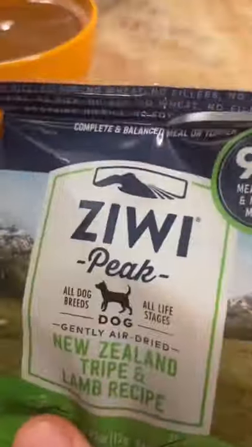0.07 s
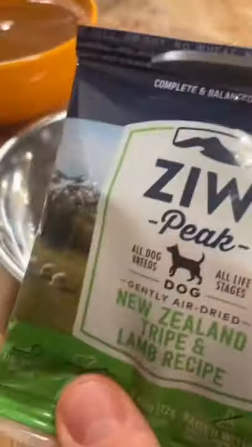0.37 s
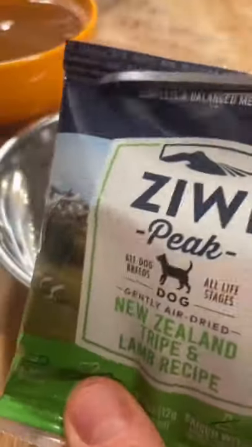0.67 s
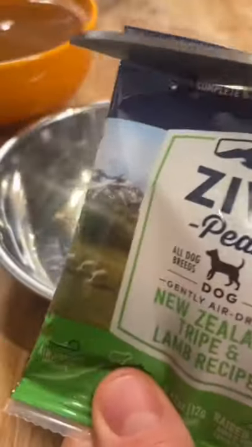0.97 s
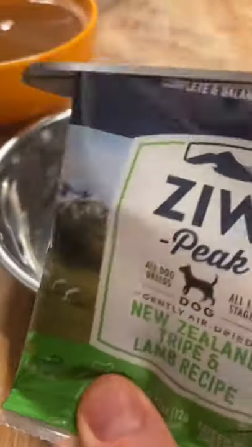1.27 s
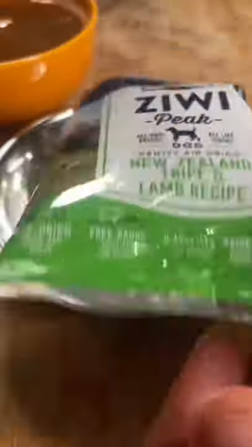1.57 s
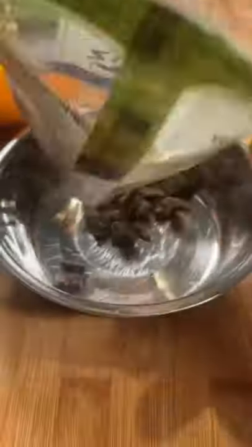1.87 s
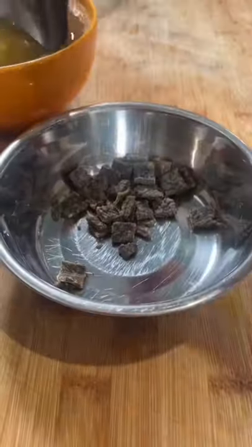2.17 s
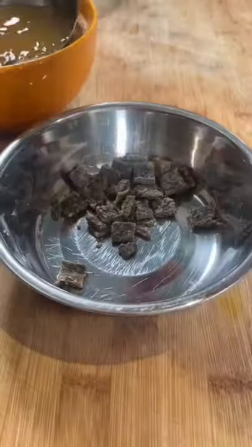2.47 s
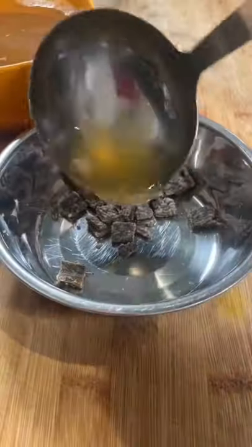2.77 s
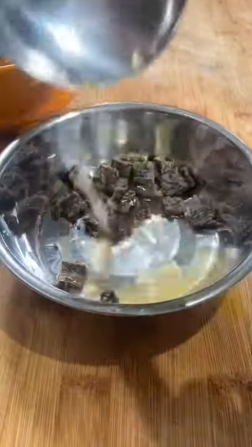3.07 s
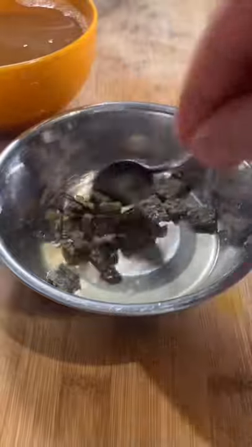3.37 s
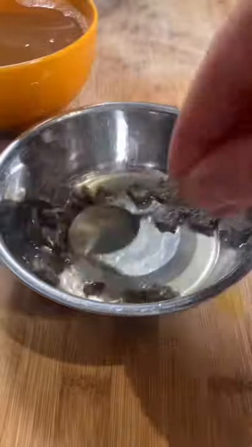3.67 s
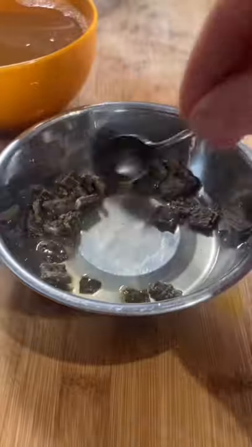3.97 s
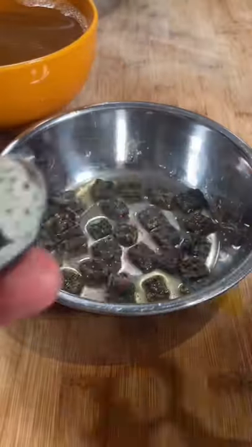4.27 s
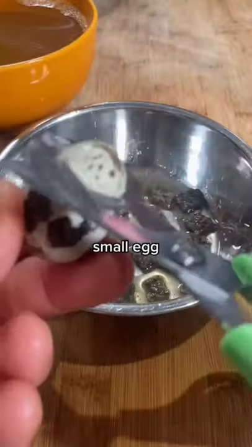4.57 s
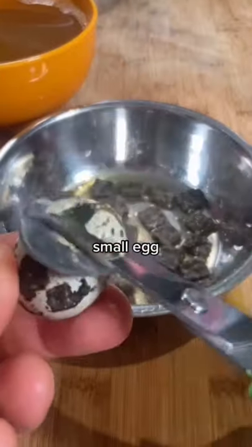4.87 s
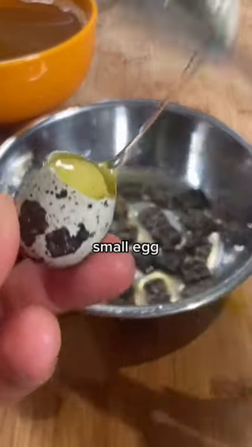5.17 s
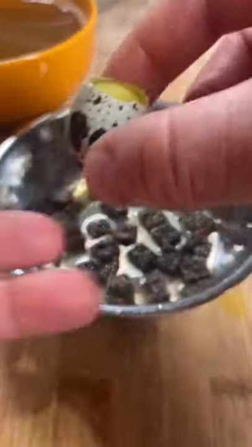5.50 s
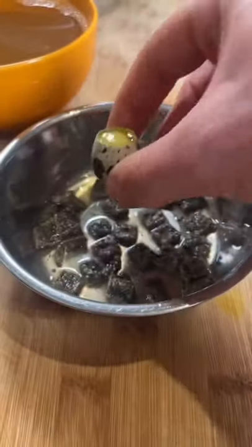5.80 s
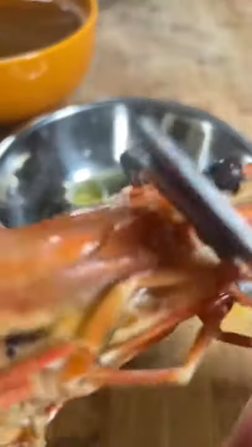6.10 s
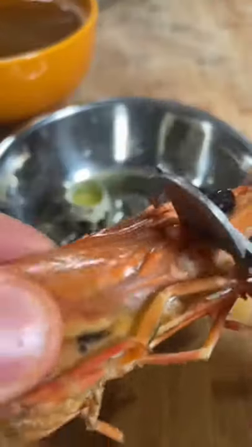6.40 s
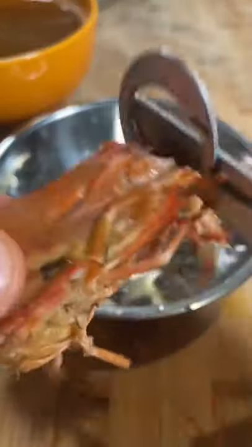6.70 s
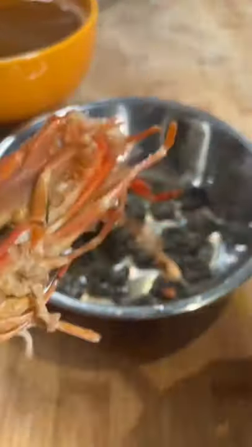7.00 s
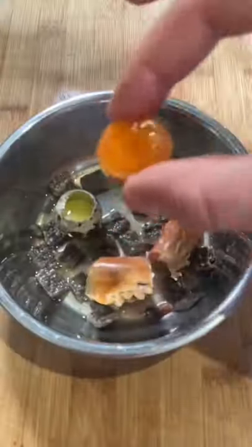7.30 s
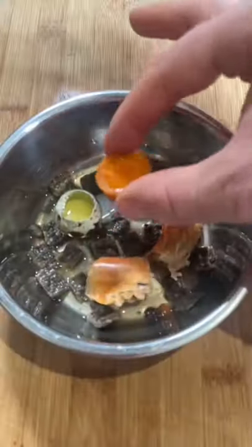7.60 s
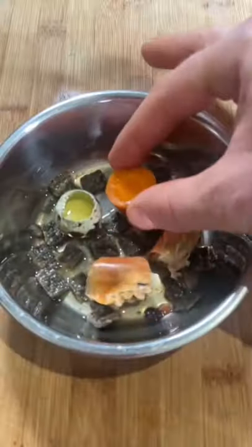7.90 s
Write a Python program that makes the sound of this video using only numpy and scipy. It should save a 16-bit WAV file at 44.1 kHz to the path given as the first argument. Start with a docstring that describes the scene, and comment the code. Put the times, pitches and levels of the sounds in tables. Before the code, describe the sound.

Scissors cut crinkling plastic, hard pieces clatter into a metal bowl, a spoon clinks and sloshes, and eggshell and prawn shell crunch.

```python
"""A dog's dinner in a steel bowl

A kitchen, the microphone close to the bowl; short moments follow one another, joined by hard cuts.
Scissors snip a plastic pouch and its creases snap, dried meat tumbles onto ringing steel, broth drips
from a ladle, and a spoon clinks and stirs up bubbles. Then the scissors crack a small egg and crunch
through a prawn's shell. Faint room air and an appliance's hum lie behind it all."""
import sys
import numpy as np
from scipy import signal
from scipy.fft import rfft, irfft
from scipy.io import wavfile
from scipy.ndimage import uniform_filter1d

SR = 44100
rng = np.random.default_rng(int(sys.argv[2]) if len(sys.argv) > 2 else 0)


def dump_mix(stems):
    """Bounce the given channels to the path in sys.argv[1] as a 16-bit WAV at rate SR."""
    frames = np.atleast_2d(stems).T  # one column per channel
    limited = np.clip(frames, -1, 1)  # hard clip at full scale
    pcm = np.round(limited * 32767).astype(np.int16)
    wavfile.write(sys.argv[1], SR, pcm)


N = 355005
TIME = np.arange(N) / SR
# where each moment starts: pouch, meat, ladle, stirring, shells, quiet ending (time [s])
CUT_TIMES = [0, 1.312, 1.936, 3.034, 4.106, 6.922]


def pouch():
    """Creases snap and crinkle under the scissors while the plastic bag flexes dully."""
    # creases snapping (time [s], relative level [dB], brightness [dB/octave], resonance [Hz])
    creases = [(0.0739, -23, 5, 4800), (0.4299, -32.5, -6.5, 1280), (0.4451, -29, -0.5, 3760),
               (0.4527, -23.5, 1.5, 2750), (0.4608, -22.5, -1.5, 3800), (0.4769, -24.5, -2.5, 2670),
               (0.4928, -21, 2.5, 2530), (0.6507, -39, -2.5, 587), (0.7954, -28, -1, 2720),
               (0.8256, -40, 1, 3920), (0.8795, -32, 2.5, 2780), (1.0433, -35, 1, 2900),
               (1.0811, -33, -4, 2360), (1.1077, -36, -3, 2680), (1.1248, -29, 6.5, 2530),
               (1.1353, -33, 5, 3270), (1.1952, -31, 2.5, 4080), (1.2475, -31.5, -3, 2400),
               (1.3957, -20.5, -2.1, 3220), (1.5123, -34.5, -4, 3900)]
    # colour of the plastic (frequency [Hz], level [dB])
    plastic = [(71, -38), (120, -17), (292, -4.5), (339, -16.5), (424, -2.5), (560, -9), (782, -3.5),
               (959, -5), (1090, -5), (1470, -6.5), (3210, 0), (3580, -4), (5000, -6), (8410, -15.5),
               (10100, -26.5), (13200, -51.5), (22000, -120)]
    # the hand squeezes for each snip, then tips the bag (peak [s], rise [s], fade [s], level [dB])
    squeezes = [(0.075, 0.045, 0.055, -47), (0.22, 0.16, 0.2, -51), (0.455, 0.088, 0.25, -40.5),
                (0.68, 0.05, 0.094, -51.5), (0.81, 0.19, 0.45, -57), (1.11, 0.088, 0.089, -37),
                (1.24, .1, 0.14, -49.5), (1.61, 0.26, .12, -41.5)]
    snaps = hits(creases, plastic, grain_s=0.0009, ring_db=10, scatter_s=0.0069, scatter_db=0.5,
                 thud_db=-4, body_db=4, edge_db=2.5, db=0)
    holding = gain_of(-63.5) * (TIME < CUT_TIMES[2])  # it rustles even when merely held
    grip = np.hypot(effort(squeezes), holding)
    crinkle = crackle(grip, plastic, per_s=8000, dull_db=0, crisp_db=1)
    flex = gain_of(-5) * grip * band_noise(80, 370)
    return snaps + crinkle + flex


def dried_meat():
    """Hard pieces slide out in a rush and land on the steel, whose ringing the heap damps."""
    # the biggest pieces (time [s], relative level [dB], brightness [dB/octave], resonance [Hz])
    landings = [(1.6259, -11.5, -2.5, 1640), (1.6287, -19.5, -6, 1420), (1.6443, -8, -2, 1619),
                (1.6596, -18, -4.5, 1590), (1.6653, -11, -1, 1390), (1.6796, -19, 4, 5730),
                (1.7654, -23, -5, 1550), (1.7883, -28.5, 4.5, 5860), (1.7993, -26.5, -3.5, 1620),
                (1.8463, -35, 0, 4390)]
    # colour of meat striking steel (frequency [Hz], level [dB])
    meat_on_steel = [(71, -54.5), (120, -29), (352, -26.5), (662, -16.5), (1050, -13), (1500, -6),
                     (1740, -8), (1910, -12), (2570, -10), (4230, -8), (4820, -15), (5910, -5),
                     (6490, -19.5), (9060, -23), (10100, -34), (13200, -65), (22000, -120)]
    # the rush of pieces (peak [s], rise [s], fade [s], level [dB])
    tumble = [(1.665, .03, 0.14, -20.5)]
    # modes of the bowl under the heap (frequency [Hz], relative level [dB], t60 [s])
    loaded_bowl = [(650.6, -4, 0.17), (801, -11, .25), (1204, -6.5, .25), (1305, -2.5, 0.18),
                   (1361, -5, 0.1), (1454, -10, 0.17), (1580, -9.5, 0.19), (1556, -3.5, 0.18),
                   (1710, -4, .22), (1750, -4, 0.31), (2498, -2, .2), (2549, -5, .2), (2560, -0.5, 0.11),
                   (2980, -8.5, 0.2), (3510, -8, 0.33), (4120, -7.5, 0.34), (4300, -12, 0.6),
                   (4505, -4, .7), (5800, -8, .25)]
    blows = hits(landings, meat_on_steel, grain_s=0.0015, ring_db=5, scatter_s=0.012, scatter_db=6,
                 thud_db=-7.5, body_db=1.5, edge_db=0, db=-1.5)
    blows += crackle(effort(tumble), meat_on_steel, per_s=1100, dull_db=-2, crisp_db=0)
    return on_bowl(blows, loaded_bowl, ring_db=-16.5) * (TIME < CUT_TIMES[2])


def bowl_clinks(split=0.0013, twin_db=-9):
    """The bowl rings until the next cut; not quite round, it has a weaker twin beating with each mode."""
    # steel modes (frequency [Hz], t60 [s], struck on rim [dB], on wall [dB], on base [dB])
    modes = [(482.4, 0.3, -46, -50, -34.5), (569, 0.41, -53, -55, -72.5), (1330, 1.8, -48, -55, -64),
             (2180, 2.3, -60, -42.5, -50.5), (2360, .3, -63, -72, -85), (2806, 2.13, -74, -47, -51),
             (3340, 1.43, -61, -40.5, -52.5), (3890, 1.8, -47, -46, -64), (4210, 0.54, -35.5, -61, -63),
             (4274, 0.95, -65, -45.5, -58), (4408, 0.39, -48, -52, -40.5), (4840, 0.85, -40, -43, -43.5),
             (4740, 0.67, -60, -53, -79), (5540, .4, -63, -67, -88.5), (5806, 0.33, -39, -30.5, -28.5),
             (6160, .45, -69, -44, -76), (6930, 0.16, -44, -38, -37), (7720, 0.14, -70, -38, -30),
             (8350, 0.076, -66, -32.5, -29)]
    # touches (time [s], gain [dB], place [0 rim, 1 wall, 2 base], softness [dB lost per kHz])
    touches = [(1.194, -1, 0, 0.5), (3.036, 5, 1, 2), (3.319, -14.5, 1, 2), (3.835, 2.5, 2, 13.5),
               (6.646, -7, 2, 5), (6.662, -5, 2, 0)]
    out = np.zeros(N)
    hz, t60, *place_db = np.transpose(modes)[:, :, None]
    for s, db, place, softness in touches:
        next_cut = min(cut for cut in CUT_TIMES if cut > s)
        t = np.arange(0, next_cut - s, 1 / SR)
        decay = gain_of(db + place_db[place] - softness * hz / 1000 - 60 * t / t60)
        phase = rng.random((len(hz), 1))
        tone = np.sin(2 * np.pi * (hz * t + phase))
        twin = gain_of(twin_db) * np.sin(2 * np.pi * (hz * (1 + split) * t + phase))
        add(out, s, (decay * (tone + twin)).sum(0) * attack(t, 0.00035))
    return out


def broth():
    """The ladle empties and the spoon shoves wet pieces against the bowl, sloshing with each stroke."""
    # ladle and spoon on meat (time [s], relative level [dB], brightness [dB/octave], resonance [Hz])
    shoves = [(2.7375, -43, -1, 1540), (2.7542, -42, 1, 1076), (2.8825, -38, 1, 1700),
              (3.1552, -29.5, 0, 1710), (3.2407, -31, 0, 980), (3.2796, -29.5, -3.5, 910),
              (3.3181, -25, 0, 615), (3.4321, -37, 0, 3430), (3.4656, -27, -1, 1380),
              (3.5741, -29.5, 0, 1100), (3.5787, -33, 0.5, 1480), (3.7428, -42, 0, 2150),
              (3.8347, -25, 0, 1363), (3.8763, -39.5, 0, 1060), (3.9364, -40.5, 3.5, 1590),
              (4.088, -37, 2.5, 9000)]
    # colour of wet meat (frequency [Hz], level [dB])
    wet_meat = [(71, -57), (120, -15), (161, -24.5), (292, -19), (474, -1.5), (726, -5), (874, -0.5),
                (1320, -5), (1940, -8.5), (2170, -7.5), (3450, -11), (4160, -12.5), (5000, -15),
                (9060, -20.5), (10100, -32), (13200, -65), (22000, -120)]
    # broth running off the ladle (peak [s], rise [s], fade [s], relative level [dB])
    ladlings = [(2.75, 0.022, 0.17, -54), (2.86, 0.12, 0.25, -55)]
    # strokes of the spoon (peak [s], rise [s], fade [s], relative level [dB])
    strokes = [(3.14, 0.084, 0.13, -39.5), (3.32, 0.05, .2, -47), (3.57, 0.055, 0.13, -42),
               (3.88, 0.015, 0.4, -44.5), (4.05, 0.083, 0.067, -43)]
    # modes of the bowl holding broth and meat (frequency [Hz], relative level [dB], t60 [s])
    wet_bowl = [(494, -13, 0.054), (847, -20, 0.058), (1120, -6.5, 0.06), (1303, 0, 0.025),
                (2830, -13.5, 0.062), (3450, 3.5, 0.024), (4370, -6, 0.087), (5170, 4.5, 0.033),
                (5940, -3, 0.028)]
    knocks = hits(shoves, wet_meat, grain_s=0.003, ring_db=8, scatter_s=0.0051, scatter_db=4.5,
                  thud_db=4, body_db=-1.5, edge_db=-4.5, db=-1)
    splash = crackle(effort(ladlings), wet_meat, per_s=970, dull_db=-4.5, crisp_db=-4)
    start_s, end_s = CUT_TIMES[3:5]
    stirring = effort(strokes) * (TIME > start_s) * (TIME < end_s)
    scrape = crackle(stirring, wet_meat, per_s=1100, dull_db=-7, crisp_db=-2.5, clump_db=1.5)
    froth = gain_of(-2.5) * stirring * bubbles(start_s, end_s)
    sticking = gain_of(-4.5) * squelches()
    return on_bowl(knocks + splash + scrape + froth + sticking, wet_bowl, ring_db=-14)


def egg():
    """The blades tap and crack the brittle shell, crunching finely between the cracks."""
    # taps and cracks (time [s], relative level [dB], brightness [dB/octave], resonance [Hz])
    breaks = [(4.3076, -35, -1, 4700), (4.3979, -47.5, -2, 4610), (4.5603, -15, 1.5, 3520),
              (4.6018, -29.5, -2, 2340), (4.623, -28, 4, 2000), (4.6368, -29, -1.5, 2150),
              (4.6426, -35, -4.5, 2000), (4.6764, -39, 5, 8960), (4.686, -36, 1.5, 4100),
              (4.7172, -31.5, -2, 3750), (4.7486, -33.5, -0.5, 2100), (4.8382, -37, 7.5, 4000),
              (5.2286, -54, -4.5, 925), (5.9922, -43.5, -2.3, 3750)]
    # colour of eggshell (frequency [Hz], level [dB])
    eggshell = [(71, -35), (120, -7.5), (191, -13), (333, -13), (492, -5), (782, -3), (858, -13),
                (1050, -6.5), (1200, -8.5), (2170, 1), (3030, -4), (4160, -0.5), (5000, -3), (9060, -2),
                (10100, -17), (13200, -69), (22000, -120)]
    # the blades pressing through (peak [s], rise [s], fade [s], relative level [dB])
    bites = [(4.57, 0.011, 0.086, -36.5), (4.63, 0.036, 0.069, -41), (4.735, 0.1, 0.11, -42.5),
             (4.835, 0.026, 0.033, -48)]
    # the blade bumping the egg dully against the fingers (peak [s], rise [s], fade [s], level [dB])
    bumps = [(4.31, .006, 0.031, -44), (4.4, .008, 0.052, -47), (4.563, .004, 0.033, -47.5),
             (4.643, 0.011, 0.014, -50)]
    cracks = hits(breaks, eggshell, grain_s=0.0005, ring_db=10, scatter_s=0.0069, scatter_db=-1.5,
                  thud_db=-0.5, body_db=1, edge_db=-5.5, db=-1)
    crunch = crackle(effort(bites), eggshell, per_s=2300, dull_db=-4, crisp_db=-0.5)
    return cracks + crunch + effort(bumps) * band_noise(90, 310)


def prawn():
    """The prawn's shell gives way under the scissors in sharp cracks and a crisp crunch."""
    # the shell breaking (time [s], relative level [dB], brightness [dB/octave], resonance [Hz])
    breaks = [(6.0789, -56.5, -6, 3880), (6.1279, -55.5, -4.5, 4350), (6.1641, -41, -4.5, 7110),
              (6.1757, -27.5, 3.5, 4350), (6.1824, -26.5, 2, 4140), (6.1875, -24.5, -1.5, 2260),
              (6.2325, -39.5, 2, 2280), (6.255, -39.5, 1.5, 4180), (6.2827, -24.5, -2, 4300),
              (6.2865, -25.5, 1, 7800), (6.2926, -34.5, 3, 2220), (6.3528, -30.5, 4.5, 3320),
              (6.3881, -31, 3.5, 4090), (6.4422, -21, -0.2, 4400), (6.4465, -23, 0, 4090),
              (6.4676, -29, 6, 4090), (6.4871, -12, 1, 2700), (6.5055, -35, 4, 4050),
              (6.5184, -35, 3, 8040), (6.6463, -42.5, -7.5, 564)]
    # colour of prawn shell (frequency [Hz], level [dB])
    shell = [(71, -37), (120, -13), (184, -47), (213, -25), (530, -24.5), (782, -17), (1200, -15.5),
             (2290, -5.5), (3090, -10), (3720, -5.5), (4080, -4.5), (6490, -10.5), (7390, -7.5), (9060, -7),
             (10100, -22), (13200, -48), (22000, -120)]
    # the blades pressing through (peak [s], rise [s], fade [s], relative level [dB])
    bites = [(6.185, 0.062, 0.11, -49.5), (6.3, .08, 0.35, -48), (6.48, .08, 0.11, -41.5),
             (6.665, 0.14, 0.11, -47)]
    cracks = hits(breaks, shell, grain_s=0.00079, ring_db=7.5, scatter_s=0.0065, scatter_db=-3.5,
                  thud_db=-4.5, body_db=-3.5, edge_db=-5.5, db=-2)
    return cracks + crackle(effort(bites), shell, per_s=1000, dull_db=-10, crisp_db=-2)


def drips():
    """Each drop traps a bubble that glides in pitch, mostly upward, and dies as it surfaces."""
    # drips and wet ticks (time [s], level [dB], pitch [Hz], glide [octaves/s], t60 [s])
    drops = [(2.029, -40, 1630, 26, 0.067), (2.029, -39, 2390, 10, 0.061), (2.088, -50, 2840, 1.5, 0.15),
             (2.091, -56.5, 1103, 0.5, 0.14), (2.205, -30, 5560, -2.5, 0.0028),
             (2.331, -41, 5230, 0.5, 0.0028), (2.739, -36.5, 1580, -7, 0.03), (2.829, -35, 1720, 9, .04)]
    out, t = np.zeros(N), np.arange(SR // 8) / SR
    for s, db, hz, glide, t60 in drops:
        cycles = np.cumsum(np.minimum(hz * 2 ** (glide * t), SR / 2)) / SR
        surfacing = np.exp(-2 * (glide * t) ** 2)
        envelope = gain_of(db - 60 * t / t60) * surfacing * attack(t, 0.000193)
        add(out, s, envelope * np.sin(2 * np.pi * cycles))
    return out


def bubbles(start_s, end_s, per_s=420, lo_hz=803, hi_hz=1660, ring_cycles=6.1, rise_per_cycle=0.014):
    """Air pockets squeezed out of the wet heap each ring for a few cycles as their pitch creeps up."""
    out, t = np.zeros(N), np.arange(SR // 25) / SR
    pitches, tries, spread_db = 24, 40, 3
    span_s = end_s - start_s
    for hz in np.geomspace(lo_hz, hi_hz, pitches):
        cycles = hz * t
        bubble = np.sin(2 * np.pi * cycles * (1 + rise_per_cycle * cycles / 2))
        bubble *= np.exp(-cycles / ring_cycles)
        for when, rarity, chance in rng.random((tries, 3)):
            if chance < per_s * span_s / (pitches * tries):
                add(out, start_s + when * span_s, gain_of(-spread_db * np.log(rarity + 0.03)) * bubble)
    return out / np.sqrt(np.mean(out[out != 0] ** 2))


def squelches():
    """Wet surfaces stick and slip in short swells."""
    # squelches and scrapes (time [s], length [s], relative level [dB], low edge [Hz], high edge [Hz])
    swells = [(2.026, 0.014, -45, 1080, 2750), (2.108, 0.044, -59.5, 6250, 9600),
              (2.193, 0.028, -49.5, 6160, 7630), (2.307, 0.037, -60, 6380, 8100),
              (3.033, 0.1, -44, 2480, 9600), (3.522, 0.046, -42, 3160, 7900),
              (4.004, 0.055, -41, 2980, 5800), (4.086, 0.01, -36.5, 8600, 9300),
              (4.363, 0.069, -60.5, 6240, 7300), (7.172, 0.027, -57.5, 1300, 2900)]
    out = np.zeros(N)
    for s, length_s, db, lo_hz, hi_hz in swells:
        slips = rng.laplace(size=SR // 4)[:round(length_s * SR)]
        swell = signal.windows.tukey(len(slips), 0.7)
        add(out, s, gain_of(db) * swell * unit_rms(band(slips, lo_hz, hi_hz)))
    return out


def thump(s, db, fade_s):
    """A soft, very low bump opens the stirring."""
    t = np.maximum(TIME - s, 0)
    return -gain_of(db) * attack(t, 0.00057) * np.exp(-t / fade_s)


def dry_tick(s, db):
    """A single dry tick follows the prawn, just before the last cut."""
    out = np.zeros(N)
    tick = pulse([(200, -15.5), (700, 4.5), (4000, 0), (9000, -8)])
    add(out, s, gain_of(db) * tick / abs(tick).max())
    return out


def hits(rows, material, grain_s, ring_db, scatter_s, scatter_db, thud_db, body_db, edge_db, db):
    """A brief burst of slips rings a flap or piece for a few cycles, then scatters off the bowl."""
    out, t = np.zeros(N), np.arange(SR // 12) / SR
    colour = [(220, thud_db), (1000, body_db), (3000, 0), (7000, edge_db)]
    usual_hit_db = -26.5
    for s, hit_db, brightness, hz in rows:
        drier_db = 0.18 * (hit_db - usual_hit_db)  # a harder hit scatters less
        burst = rng.standard_normal(len(t)) * np.exp(-t / grain_s)
        burst *= np.sqrt(t)  # the slips take a moment to spread
        scatter = rng.standard_normal(len(t)) * np.exp(-t / scatter_s)
        scatter *= gain_of(scatter_db - drier_db) / np.linalg.norm(scatter)
        drive = burst / np.linalg.norm(burst) + scatter
        drive[round(grain_s * SR / 2)] += 0.5  # the main release
        tilt = [(200, -4 * brightness), (6400, brightness)]
        resonance = [(hz * 0.78, 0), (hz, ring_db), (hz * 1.28, 0)]
        sound = signal.fftconvolve(drive, pulse(material, colour, tilt, resonance))
        onset_rms = np.sqrt(np.mean(sound[:SR // 250] ** 2))
        add(out, s, gain_of(hit_db + db) * sound / onset_rms)
    return out


def crackle(force, material, per_s, dull_db, crisp_db, clump_db=3.5):
    """Many tiny slips of uneven size come in clumps, heard through the material's colour."""
    clumps = gain_of(clump_db * wander(SR // 100))
    sizes = gain_of(3.5 * np.minimum(rng.exponential(1, N), 3.5)) * rng.choice([-1, 1], N)
    slipping = rng.random(N) < per_s / SR
    grains = signal.oaconvolve(sizes * clumps * slipping, pulse(material))[:N]
    dull = gain_of(dull_db) * unit_rms(band(grains, 150, 1500))
    crisp = gain_of(crisp_db) * unit_rms(band(grains, 1500, 12000))
    return force * (dull + crisp)


def effort(gestures):
    """Each gesture of the hand swells by 20 dB over its rise time and dies by 20 dB over its fade time."""
    power = np.zeros(N)
    for s, rise_s, fade_s, db in gestures:
        away = np.maximum((s - TIME) / rise_s, (TIME - s) / fade_s)
        power += gain_of(db - 20 * np.minimum(away, 10)) ** 2
    return np.sqrt(power)


def on_bowl(force, modes, ring_db):
    """The contact sound plus the ringing it drives in the steel."""
    t = np.arange(SR // 2) / SR
    ring = sum(gain_of(db - 60 * t / t60) * np.cos(2 * np.pi * hz * t) for hz, db, t60 in modes)
    return force + gain_of(ring_db) * signal.oaconvolve(force, ring / np.linalg.norm(ring))[:N]


def kitchen(x, wet_db):
    """Dense echoes die away band by band behind the direct sound; each cut stops their tail."""
    # reverberation of the kitchen (frequency [Hz], t60 [s])
    decay_times = [(150, 0.16), (600, 0.47), (2500, 0.41), (6000, 0.31), (10000, .33)]
    t = np.arange(SR // 2) / SR
    echoes = rng.standard_normal(len(t)) * attack(t, 0.0049)
    hz, age_s, spectra = signal.stft(echoes, SR, nperseg=256)
    spectra = spectra * gain_of(-60 * age_s / read(decay_times, hz)[:, None])
    tail = signal.istft(spectra, SR, nperseg=256)[1]
    tail *= gain_of(wet_db) / np.linalg.norm(tail[:len(t)])
    moments = np.split(x, [round(cut * SR) for cut in CUT_TIMES[1:]])
    return np.concatenate([part + signal.fftconvolve(part, tail)[:len(part)] for part in moments])


def room_tone():
    """Faint steady air, a trace of rumble and an appliance's slightly wavering hum."""
    # colour of the room's air (frequency [Hz], relative level [dB])
    air_colour = [(47, -29.5), (80, 4.5), (130, -10.5), (270, -9), (448, -12), (476, -12), (571, -11),
                  (658, -17), (1140, -22.5), (2830, -26), (3320, -27), (8610, -31), (10100, -39.5),
                  (13200, -76), (22000, -120)]
    # tones of the appliance (frequency [Hz], level [dB])
    hum_tones = [(57, -60.5), (99, -77), (113, -74)]
    air_gain = gain_of(read(air_colour, np.fft.rfftfreq(N, 1 / SR)))
    air = irfft(rfft(rng.standard_normal(N)) * air_gain, N)
    air *= gain_of(-66.5) / np.std(band(air, 80, 10000))
    rumble = gain_of(-65.5) * band_noise(15, 51)
    wavering_time = np.cumsum(1 + 0.01 * wander(SR // 8)) / SR
    hum = sum(np.sqrt(2) * gain_of(db) * np.sin(2 * np.pi * hz * wavering_time) for hz, db in hum_tones)
    return air + rumble + hum


def gain_of(db):
    """Decibels to amplitude."""
    return 10 ** (np.asarray(db) / 20)


def unit_rms(x):
    """Scales to rms 1."""
    return x / np.sqrt(np.mean(x ** 2) + 1e-20)


def attack(t, rise_s):
    """An exponential rise from 0 toward 1."""
    return 1 - np.exp(-t / rise_s)


def read(points, hz):
    """Reads a table on a log-frequency axis."""
    table_hz, values = np.transpose(points)
    return np.interp(np.log(hz + 1), np.log(table_hz + 1), values)


def add(mix, s, sound):
    """Adds a sound at time s."""
    part = mix[round(s * SR):][:len(sound)]
    part += sound[:len(part)]


def band(x, lo_hz, hi_hz):
    """Band-pass."""
    return signal.sosfilt(signal.butter(3, [lo_hz, hi_hz], "band", fs=SR, output="sos"), x)


def band_noise(lo_hz, hi_hz):
    """A band of noise at rms 1."""
    return unit_rms(band(rng.standard_normal(N), lo_hz, hi_hz))


def wander(samples):
    """Random drift at rms 1, smoothed over this many samples."""
    return unit_rms(uniform_filter1d(rng.standard_normal(N), samples))


def pulse(*spectra, size=2048):
    """The shortest causal pulse that has the summed (frequency [Hz], level [dB]) spectra."""
    hz = abs(np.fft.fftfreq(size, 1 / SR))
    db = np.maximum(sum(read(spectrum, hz) for spectrum in spectra), -70)
    minimum_phase = np.exp(np.conj(signal.hilbert(np.log(gain_of(db)))))
    return np.fft.ifft(minimum_phase).real[:size // 2]


def scene():
    """The work at the bowl from close by, in mono, with the kitchen behind it."""
    mix = kitchen(pouch(), wet_db=-16)
    mix += kitchen(dried_meat(), wet_db=-13)
    mix += kitchen(broth(), wet_db=-10.5)
    mix += kitchen(egg() + prawn(), wet_db=-19.5)
    mix += drips() + bowl_clinks()
    mix += thump(s=3.035, db=-34.5, fade_s=0.54) + dry_tick(s=6.9205, db=-16)
    return (mix + room_tone())[None]


def record(dry):
    """The phone's microphone holds peaks to full scale and loses the top treble steeply."""
    edge_hz = 10250
    lowpass = signal.firwin(255, edge_hz, window=("kaiser", 7), fs=SR)
    return signal.oaconvolve(np.clip(dry, -1, 1), lowpass[None], "same")


dry = scene()
out = record(dry)
dump_mix(out)
```